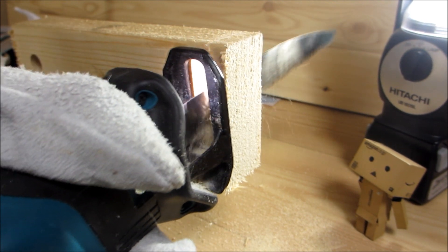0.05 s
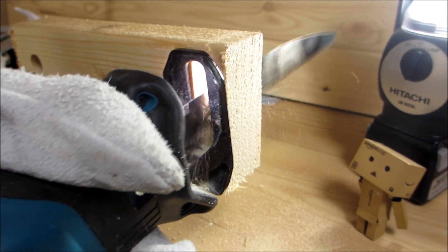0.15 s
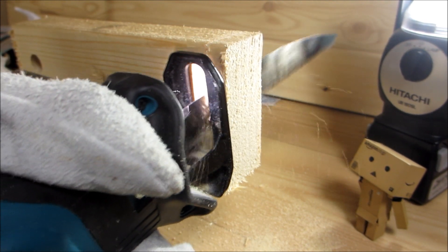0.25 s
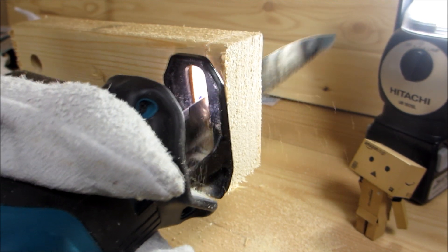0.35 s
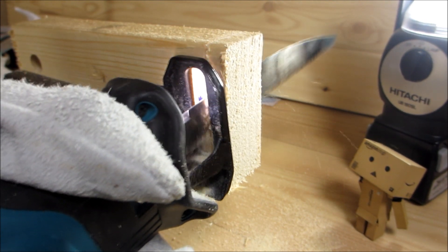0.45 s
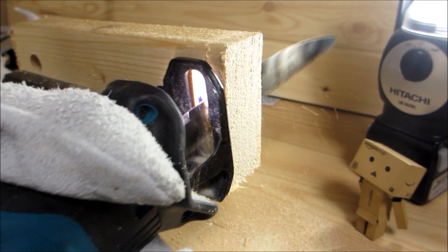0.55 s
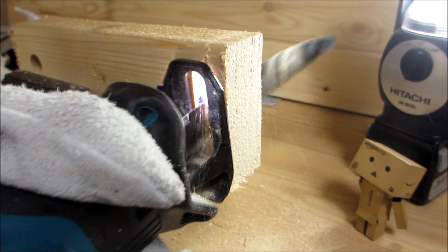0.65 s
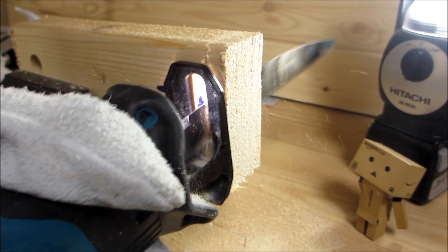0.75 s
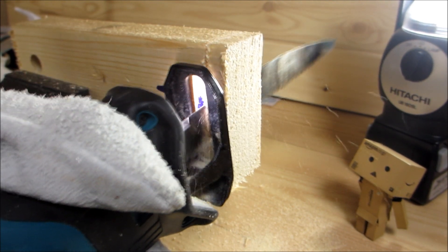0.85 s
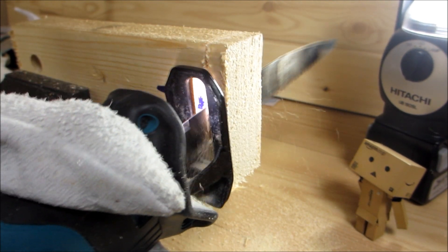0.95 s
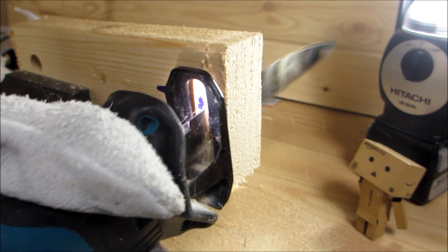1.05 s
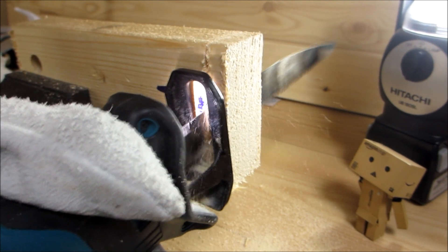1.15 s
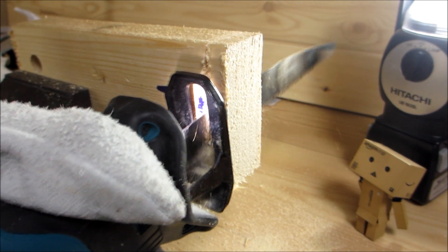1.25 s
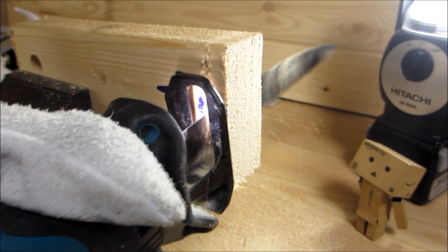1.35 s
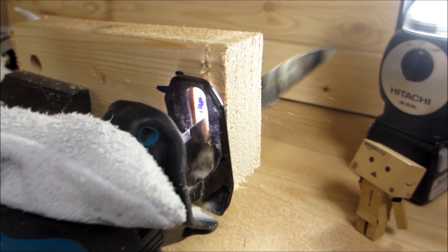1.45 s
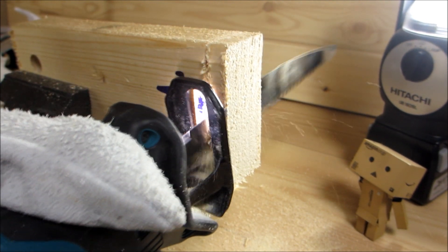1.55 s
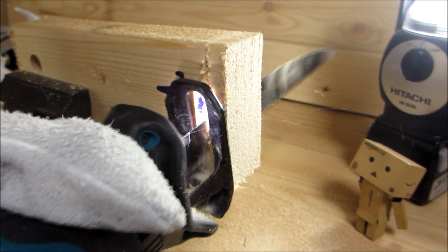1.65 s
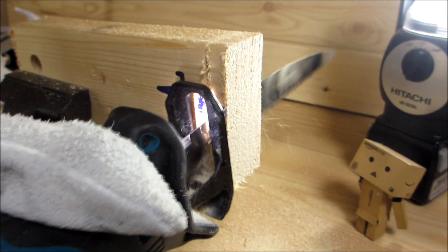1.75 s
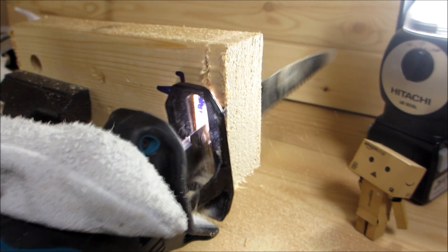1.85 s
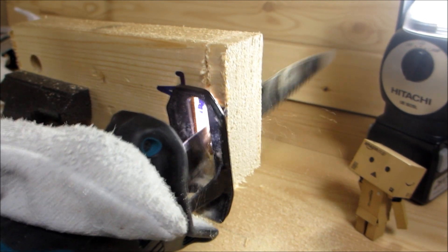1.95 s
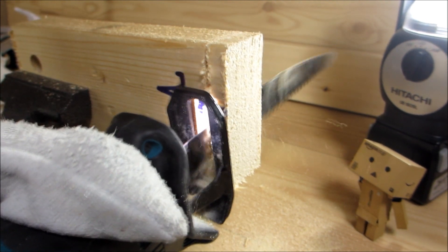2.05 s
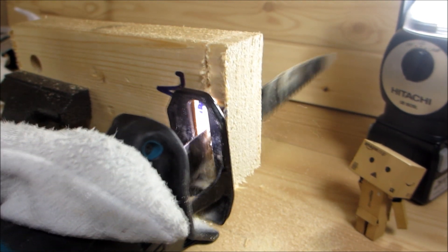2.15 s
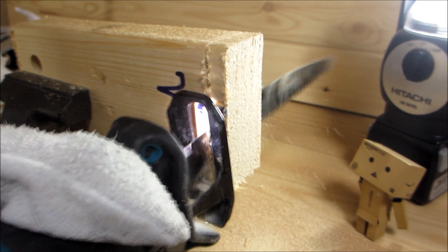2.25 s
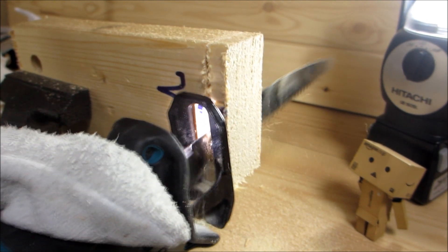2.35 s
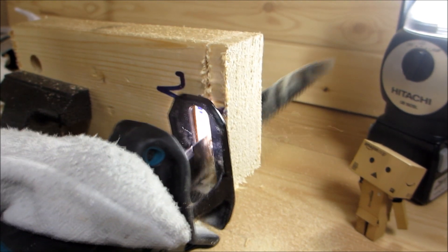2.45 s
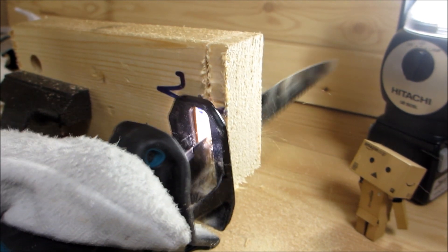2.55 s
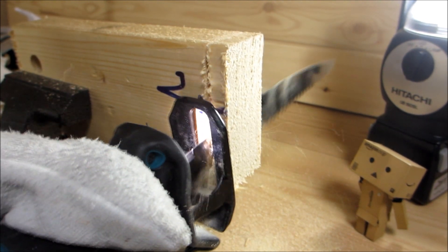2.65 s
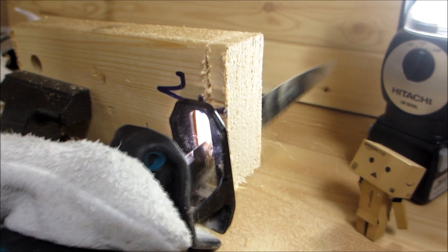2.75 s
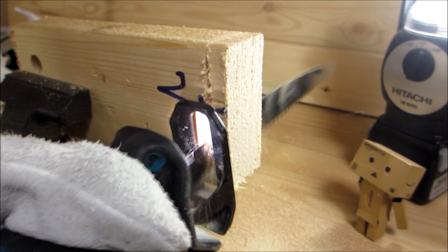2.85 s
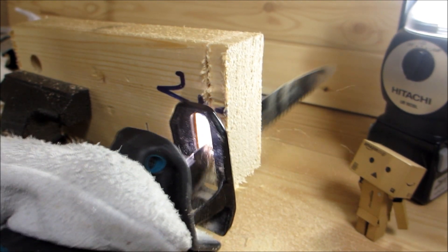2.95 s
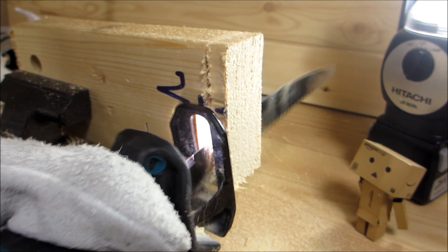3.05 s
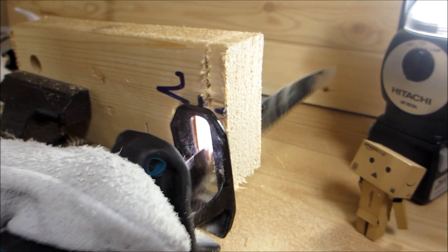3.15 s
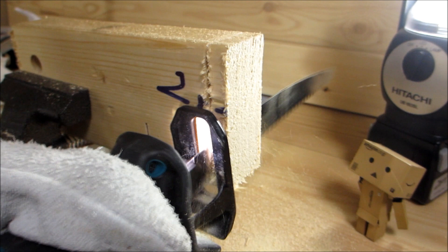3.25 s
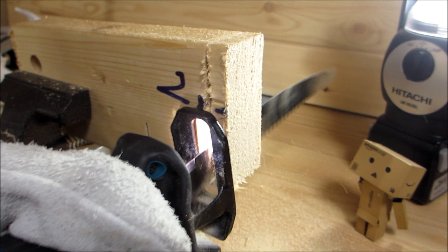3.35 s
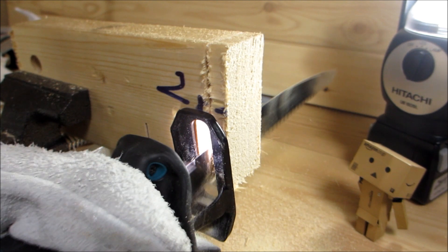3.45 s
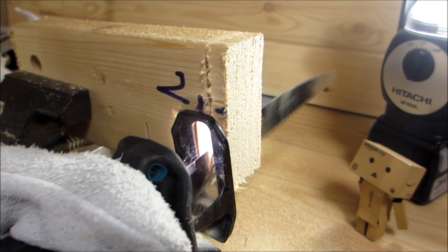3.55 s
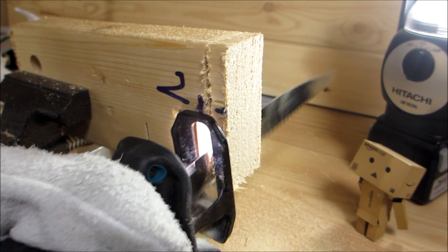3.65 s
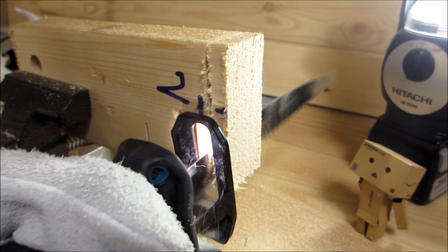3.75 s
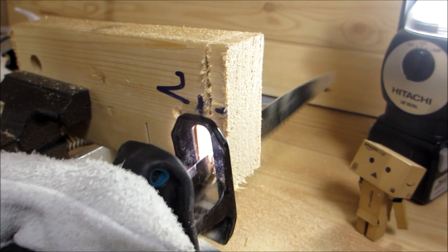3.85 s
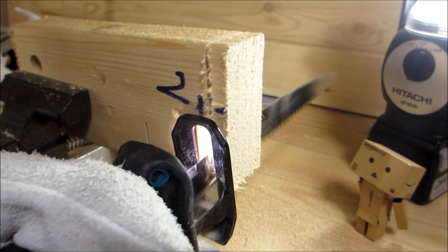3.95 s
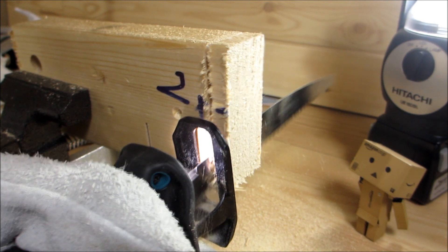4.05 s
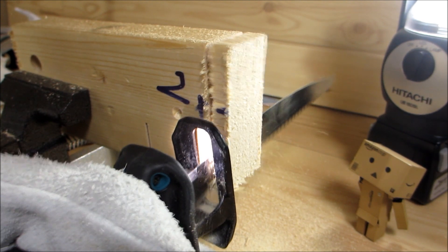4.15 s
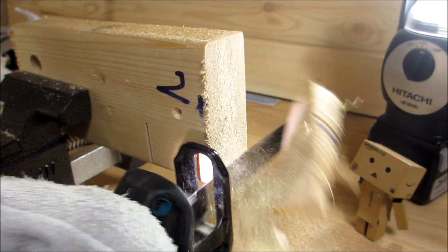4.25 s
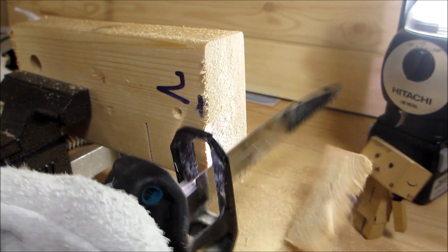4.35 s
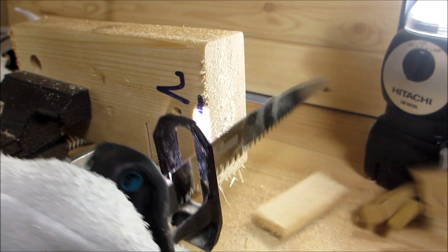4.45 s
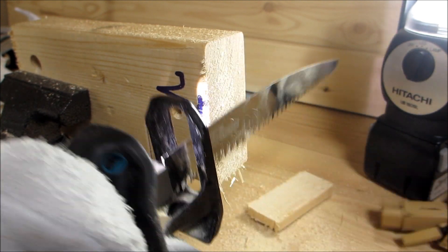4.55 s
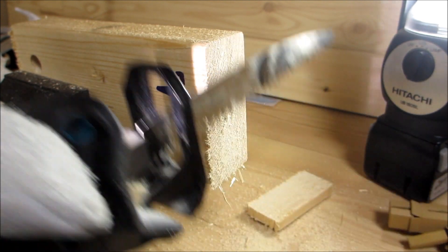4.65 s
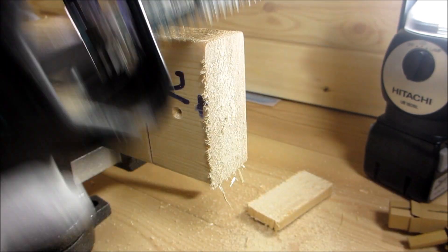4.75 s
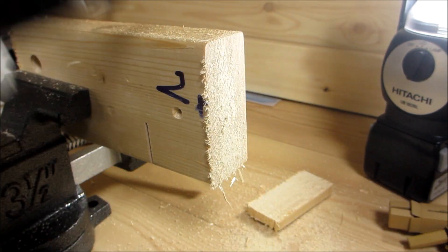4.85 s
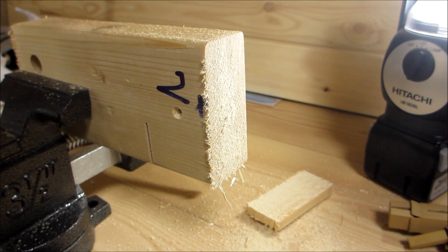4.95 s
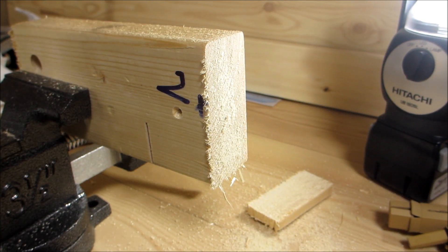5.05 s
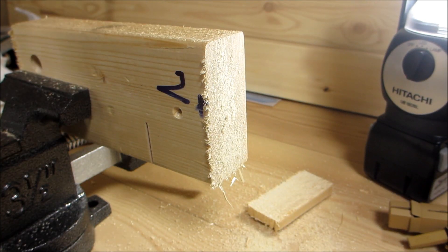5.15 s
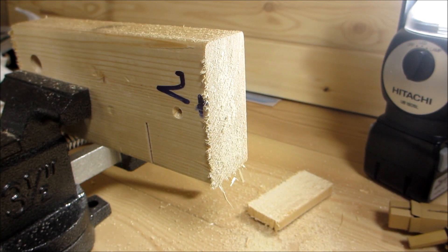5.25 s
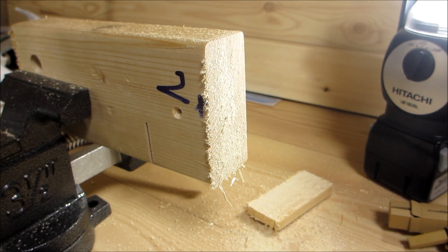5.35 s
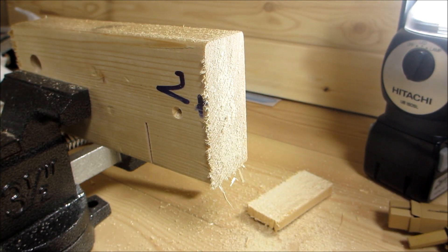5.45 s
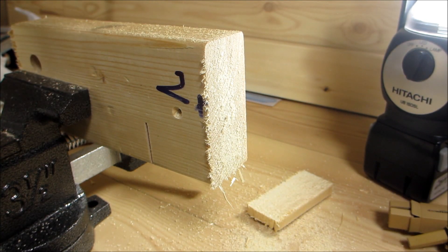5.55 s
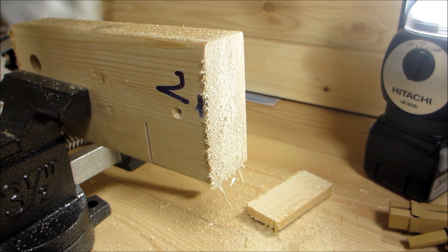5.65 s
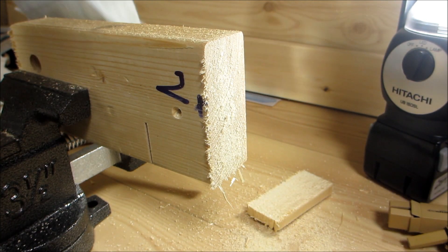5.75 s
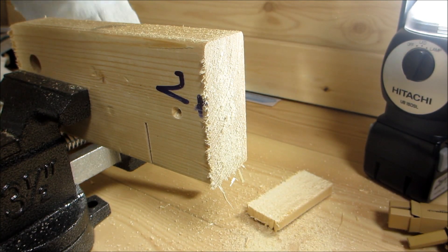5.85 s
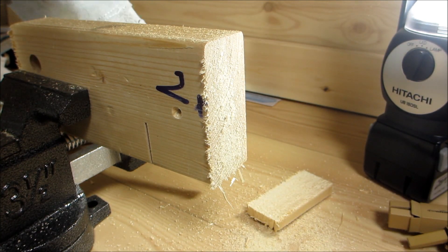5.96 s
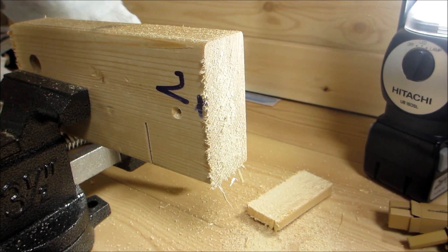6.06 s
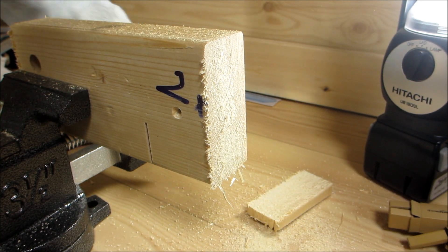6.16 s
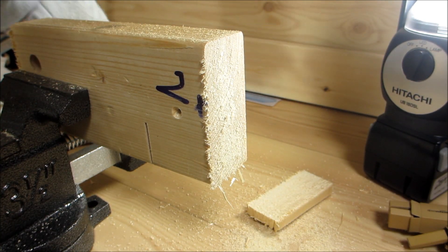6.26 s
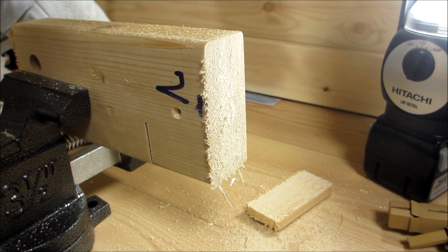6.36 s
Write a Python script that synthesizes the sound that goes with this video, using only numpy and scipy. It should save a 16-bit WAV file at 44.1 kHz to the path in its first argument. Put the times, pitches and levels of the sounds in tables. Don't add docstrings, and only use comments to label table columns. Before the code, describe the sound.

A cordless reciprocating saw chatters loudly through a clamped softwood beam, snags and breaks free, the offcut tumbles, then faint rustles and metallic vice-handle knocks.

```python
import sys
import numpy as np
from scipy import signal
from scipy.fft import rfft, irfft, next_fast_len
from scipy.io import wavfile
from scipy.ndimage import uniform_filter1d

SR = 44100
rng = np.random.default_rng(int(sys.argv[2]) if len(sys.argv) > 2 else 0)


def gain_from_db(level_db):
    decades = np.asarray(level_db, float) / 20
    return 10 ** decades


def materialize(psi):
    bounded = np.clip(np.atleast_2d(psi).T, -1, 1)
    quanta = np.round(bounded * 32767).astype(np.int16)
    wavfile.write(sys.argv[1], SR, quanta)


N = 283122
T = np.arange(N) / SR
BENCH_HZ = 210.4
THIN_S, NEAR_GONE_S, THROUGH_S = 3.136, 3.49, 4.26
BRAKE_S, SETTLE_S, STOP_S = 4.545, 4.665, 4.76
CUTTING, RUNNING = T < THROUGH_S, T < BRAKE_S
FREE_S = np.maximum(T - THROUGH_S, 0)
THIN = np.clip((T - THIN_S) / 0.24, 0, 1)
FREE_FADE = gain_from_db(-150 * FREE_S)

# time in seconds, level in dB.
PRESSURE = [(0, -26), (.6, -25), (1.3, -25), (1.6, -25), (2.3, -25), (2.95, -25), (3.3, -24), (3.8, -27),
            (4.05, -24.5), (4.105, -31.5), (4.15, -25.5), (4.27, -28.5), (4.34, -30), (4.41, -30.5),
            (4.54, -31.5), (4.575, -43.5), (4.66, -49.5), (4.74, -64)]


def saw():
    turns = crank()
    chatter = gain_from_db(-.5 * wander(240) * THIN * CUTTING)
    pressure = level(PRESSURE) * chatter
    load = pressure / gain_from_db(PRESSURE[0][1])
    bites = teeth(turns)
    out = tearing(bites, pressure) + stroke_ends(turns) + rebounds(turns, load)
    out += housing(turns) + bench(turns, bites) + motor(turns, load)
    return out + loose_housing() + brake(bites)


# stage start in seconds, strokes per second.
STROKE_RATE = [(0, 37.21), (.7, 36.8), (2., 35.6), (3.1, 37.15), (3.3, 38.4), (3.5, 39.5), (3.6, 39.97),
               (4.2, 43.), (4.3, 41.), (4.45, 37), (4.5, 33), (4.55, 21.), (4.75, 0)]
# time in seconds, lag in turns.
CRANK_LAG = [(0, .085), (.3, .062), (.88, .088), (1.07, .075), (1.24, .005), (1.42, .03), (1.8, .022),
             (2.0, -.005), (2.4, -.017), (2.6, .028), (2.78, .005), (2.98, .035), (3.18, 0), (3.37, .015),
             (3.55, -.01), (4.1, -.005), (4.25, .02)]


def crank():
    stage_s, rate = np.transpose(STROKE_RATE)
    stepped = rate[np.searchsorted(stage_s, T, "right") - 1]
    smooth = uniform_filter1d(stepped, size=4000, mode="nearest")
    return -.98 + np.cumsum(smooth) / SR - np.interp(T, *np.transpose(CRANK_LAG))


def teeth(turns):
    swing = np.where(CUTTING, .35, .5)
    pull = np.exp(swing * np.cos(4 * np.pi * (turns - .15)) + 0.12 * np.cos(2 * np.pi * (turns - .75)))
    strength = gain_from_db(.7 * np.minimum(rng.exponential(1, N), 3))
    fresh = (rng.random(N) < 12000 / SR) * rng.standard_normal(N) * strength
    edge = rng.standard_normal((40, 1200)) * (rng.random((40, 1200)) < .3)
    depth = 7 * T
    place = (turns % 1 * 1200).astype(int)
    row = depth.astype(int) % 39
    blend = np.pi / 2 * (depth % 1)
    returning = np.cos(blend) * edge[row, place] + np.sin(blend) * edge[row + 1, place]
    return pull * (evened(fresh) + 0.68 * evened(returning))


# frequency in Hz, level in dB.
BEAM = [(71, -38.5), (120, -5.5), (216, 3), (452, -6.5), (680, 2), (1250, -10), (1470, -11), (1760, -14.5),
        (2920, -32), (4120, -30), (6000, -38), (7800, -52), (13200, -120)]
# frequency in Hz, width in Hz, lift in dB.
BEAM_PEAKS = [(359, 110, 3.5), (520, 97, 3), (711, 177, 6), (905, 130, 2.5), (1118, 384, 11), (1288, 30, 7),
              (1784, 355, 10.5), (2890, 150, 4.5), (3570, 110, 2.5)]
# time in seconds, gain in dB.
BRIDGE = [(0, -0.5), (1.5, -4), (3, -5.5), (3.7, -11.5), (4.1, -5), (4.3, -1.5), (4.8, -23)]
# time in seconds, gain in dB.
BELLY = [(0, 2), (1.5, -0.5), (2.5, 0), (3.3, -0.5), (3.6, 5), (4.2, 5), (4.3, -0.5), (4.8, 4.5)]


def tearing(bites, pressure):
    beam = evened(colour(bites, BEAM, BEAM_PEAKS))
    upper = zero_phase(beam, [930, 1500], "band")
    belly = zero_phase(beam, [520, 780], "band")
    lower = zero_phase(beam, 500, "low") * np.clip(FREE_S / .07, 0, .9)
    shaped = beam + (level(BRIDGE) - 1) * upper + (level(BELLY) - 1) * belly - lower
    return gain_from_db(-2.5) * pressure * shaped


# frequency in Hz, level in dB.
FAR_END = [(200, -21), (500, -10.5), (900, -4), (1250, 0), (1800, 0), (3000, -1), (4200, -7), (5600, -0.5),
           (7000, -1.5), (8500, -9), (11000, -0.5), (15500, -17)]
# frequency in Hz, level in dB.
NEAR_END = [(200, -21), (500, -12.5), (850, -14), (1150, -3.5), (2000, -15), (3200, -13.5), (5000, -24.5),
            (15000, -49)]


def stroke_ends(turns):
    far_late_db = (1.5 - 3.5 * (T - THIN_S - .3)) * THIN
    far_db = 13.5 + np.where(CUTTING, -46 + far_late_db, -59)
    jam = 1 - 0.45 * (abs(T - 4.1) < .012)
    far = gain_from_db(far_db) * jam * stroke_end(turns, -0.03954, 0.0011, 0.89, 1.0, FAR_END)
    near_db = 3.0 + np.where(CUTTING, -36 - 0.22 * T - 17 * (T > NEAR_GONE_S), -61.5)
    near = gain_from_db(near_db) * stroke_end(turns, .46, 0.013, 0.46, 1.0, NEAR_END)
    return RUNNING * (far - near)


# frequency in Hz, level in dB.
REBOUND = [(200, -17), (420, -12.5), (700, -2), (1100, -13), (1800, -12.5), (2800, -19), (5000, -36.5),
           (15000, -43.5)]


def rebounds(turns, load):
    push = gain_from_db(-39 + 1.5 * T) * stroke_end(turns, .07, 0.0075, 0.93, 1.6, REBOUND)
    pull = gain_from_db(-41) * stroke_end(turns, .58, 0.0075, 0.93, 1.6, REBOUND)
    contact = np.where(CUTTING, gain_from_db(-5 * (T > NEAR_GONE_S)), gain_from_db(-23))
    return load * RUNNING * contact * (push + pull)


def stroke_end(turns, at_turn, burst_s, spread_db, rough, points):
    late, loose = rng.standard_normal((2, 400))
    stroke = np.floor(turns - at_turn).astype(int) + 1
    delay = .04 + .005 * np.clip(late, -2, 2)[stroke]
    since = np.maximum((turns - at_turn) % 1 - delay, 0) / 37
    blow = np.diff(since > 0, prepend=True) & (since > 0) & (since < .001)
    blunt = signal.sosfilt(signal.butter(2, 2500, fs=SR, output="sos"), 1. * np.roll(blow, 22))
    rattle = np.exp(-since / burst_s) * (1 - np.exp(-since / .001)) * rng.standard_normal(N)
    impacts = evened(blunt) + rough * evened(rattle)
    strength = gain_from_db(spread_db * np.clip(loose, -2, 1.5))[stroke]
    return evened(colour(strength * impacts, points, BEAM_PEAKS))


# multiple of stroke rate, level in dB, phase in rad.
SHAKE = [(1, -46, 16), (2, -17, -1), (3, 1, 0.63), (4, -2, -1), (5, -15, -2.5), (7, -5, -0.15),
         (8, -9.5, 5), (9, -3.5, -1.5), (15, -27, 2)]


def housing(turns):
    out = np.zeros(N)
    for k, db, rad in SHAKE:
        gain = gain_from_db(db + 0.97 * wander(7.6) - 6.7 * THIN * (k > 6))
        out += gain * np.cos(2 * np.pi * k * turns + rad + 0.08 * k * wander(16))
    fade = gain_from_db(3.5 - 38 - 2.2 * T - 15 * np.maximum(T - 3.6, 0)) * FREE_FADE
    return fade * RUNNING * evened(out)


# time in seconds, lift in dB.
SURGES = [(.0, 14.5), (.34, 2), (.48, 4), (.57, 5), (.92, 5.5), (1.32, 7.5), (1.75, 2), (1.95, 2.5),
          (2.12, 2.5), (2.35, 5.5), (2.45, -2), (2.66, -7.5), (2.86, 4), (3.03, -14), (3.24, 2),
          (3.51, 7.5), (3.62, 5), (3.74, 4.5), (3.92, 1), (4.08, 5), (4.18, -3), (4.28, -0.5)]


def bench(turns, bites):
    push = sum(np.cos(2 * np.pi * k * turns - 2.2 + 0.68 * wander(24.0)) for k in (5, 6))
    driven = evened(resonate(resonate(push, BENCH_HZ, 24), BENCH_HZ, 40))
    bitten = evened(resonate(resonate(bites, BENCH_HZ, 9), BENCH_HZ, 30))
    hum = gain_from_db(-0.8 - 38.5 + bumps(SURGES, 0.052) - 200 * FREE_S)
    return hum * evened(driven + .5 * bitten)


# frequency in Hz, level in dB.
HISS = [(880, -20.5), (1500, 3.5), (1770, -4.5), (1930, 1.5), (2110, 0), (2950, -0.5), (3400, -7),
        (3680, -8.5), (4000, -12), (4240, -14), (6710, -11.5), (8830, -14), (10700, -7), (14500, -16),
        (15600, -14)]


def motor(turns, load):
    throb = 1 + 0.036 * np.cos(2 * np.pi * (turns - .12)) + 0.013 * np.cos(4 * np.pi * (turns - .2))
    hiss = colour(rng.standard_normal(N) * gain_from_db(1.54 * wander(400)), HISS) * throb
    whine = gain_from_db(-21) * evened(resonate(rng.standard_normal(N), 6950, 30))
    running_db = [(THROUGH_S, -40), (BRAKE_S, -40 - 7.5), (BRAKE_S + 0.021, -65), (SETTLE_S, -65),
                  (STOP_S, -97)]
    return gain_from_db(4.5) * level(running_db) * np.where(CUTTING, load, 1) * (hiss + whine)


def loose_housing():
    rumble = evened(resonate(resonate(rng.standard_normal(N), 110, 55), 110, 55))
    return gain_from_db(-48) * THIN * FREE_FADE * rumble


def brake(bites):
    rub = evened(resonate(resonate(bites, 2000, 2200), 2000, 2200))
    return gain_from_db(-54.5) * bumps([(4.57, 1)], 0.1) * (T > BRAKE_S) * rub


# time in seconds, peak in dB, body frequency in Hz, tick in dB.
SNAGS = [
    (3.444, -12, 1300, -18),
    (3.497, -22, 1500, -18),
    (3.509, -17, 1300, -24),
    (3.773, -14, 1000, -18),
    (3.873, -26, 900, -8),
    (4.122, -13, 1100, -18),
    (4.246, -17, 900, -25),
    (4.266, -27, 800, -6),
    (4.303, -32, 2600, -40),
    (4.489, -31, 2300, -40),
]
# time in seconds, peak in dB, body in Hz, tick in dB.
SLAPS = [(4.344, -29.5, 930, -20), (4.365, -29, 945, -21), (4.38, -30, 940, -23), (4.391, -26.5, 950, -19),
         (4.401, -27, 950, -22), (4.412, -22, 955, -23), (4.424, -26, 950, -25), (4.436, -32, 950, -24),
         (4.446, -28.5, 950, -18), (4.46, -27, 950, -20), (4.472, -27.5, 950, -17), (4.487, -33, 950, -22),
         (4.502, -29, 950, -18), (4.516, -34, 940, -20)]
# time in seconds, peak in dB, body in Hz, tick in dB.
TUMBLE = [(4.533, -26.5, 700, -19), (4.541, -41.5, 716, -21.5), (4.563, -32, 750, -27),
          (4.589, -36, 640, -15), (4.605, -32.5, 674, -21), (4.621, -52, 955, -12),
          (4.632, -34.5, 810, -11), (4.647, -26.5, 910, -16.5), (4.652, -33, 776, -22),
          (4.659, -32, 664, -19), (4.674, -39, 700, -19), (4.716, -46, 646, -12), (4.728, -56, 834, -7)]
# time in seconds, peak in dB, body in Hz, tick in dB.
CHIPS = [(4.845, -58, 700, -20), (4.903, -55, 900, -20), (4.919, -42.5, 1750, -25), (4.94, -52, 1200, -26),
         (4.951, -57, 1200, -26), (5.19, -45, 925, -33), (5.194, -38.5, 1010, -46), (5.204, -49, 714, -40),
         (5.263, -51, 2370, -13), (5.266, -43.5, 1640, -23), (5.325, -40, 1470, -21),
         (5.328, -42, 1215, -29.5), (5.343, -52, 1400, -24), (5.35, -47, 1500, -17),
         (5.363, -40, 1200, -26), (5.369, -37.5, 1620, -23), (5.378, -66, 904, -30),
         (5.389, -48, 1000, -30)]
# time in seconds, peak in dB, body in Hz, tick in dB.
CLANKS = [
    (6.139, -37, 715, -0.5),
    (6.154, -30, 738, -30),
    (6.167, -34.5, 665, -30),
    (6.2, -50, 1400, -32),
    (6.284, -40, 824, -29),
    (6.33, -43, 620, -21),
    (6.346, -31.5, 940, -11.5),
    (6.35, -31.5, 950, -29),
]


def knocks(out):
    groups = ((SNAGS, -40, 0.021, .8), (TUMBLE, -19, 0.029, 1.6), (CHIPS, -33, 0.025, 1),
              (CLANKS, -5.5, .06, 2.9), (SLAPS, -50, .03, 1.5))
    for rows, thud_db, t60_s, rough in groups:
        for s, db, hz, tick_db in rows:
            add(out, s - .001, gain_from_db(db) * knock(hz, thud_db, tick_db, t60_s, rough))


# factor on body frequency, relative width, level in dB.
BODY = [(.62, .3, -3), (1., .3, 0), (1.5, .4, -5), (2.1, .6, -16)]


def knock(hz, thud_db, tick_db, t60_s, rough):
    t = np.arange(SR // 4) / SR
    scrape = bright_noise(len(t)) * gain_from_db(-60 * t / max(t60_s, .008)) * (1 - np.exp(-t / .0006))
    click = np.diff(np.arange(len(t) + 1) == 12) * rng.choice([-.7, .7])
    blow = rough * scrape / np.linalg.norm(scrape) + click
    body = np.zeros(len(t))
    for k, w, db in BODY:
        body += gain_from_db(db) * evened(resonate(resonate(blow, hz * k, hz * w), hz * k, 2 * hz * w))
    band = signal.butter(2, [.45 * hz, 2.6 * hz], "band", fs=SR, output="sos")
    body = signal.sosfilt(band, body - .5 * np.roll(body, 8))
    tick = evened(resonate(resonate(bright_noise(len(t)), 2500, 6000), 8000, 12000))
    tick *= np.exp(-t / 0.0014) + 0.06 * np.exp(-t / 0.023)
    thud = np.sin(2 * np.pi * BENCH_HZ * t) * (1 - np.exp(-t / 0.0076)) * gain_from_db(-60 * t / 0.098)
    return body / abs(body).max() + gain_from_db(tick_db + 1.0) * tick + gain_from_db(thud_db + 10.0) * thud


# time in seconds, level in dB.
SLIDE = [(6.14, -27.5), (6.158, -27), (6.174, -30), (6.29, -34), (6.338, -36), (6.348, -26.5), (6.42, -41)]
# frequency in Hz, level in dB.
VICE = [(180, -47), (300, -14), (814, -3.5), (1080, -20), (1370, -13.5), (2040, -29.5), (3020, -25),
        (4250, -46), (15000, -51)]
# frequency in Hz, width in Hz, lift in dB.
HANDLE_PEAKS = [(603, 60, 6), (810, 59, 0.5), (1400, 49, 9), (2920, 200, 0), (3700, 150, -1.5),
                (5700, 150, 4), (7000, 100, 8), (10400, 150, 10), (13540, 120, 9)]
# time in seconds, level passed to the bench legs in dB.
STEEL_AT = [
    (6.138, -56),
    (6.191, -80),
    (6.282, -75),
    (6.346, -45),
]
# frequency in Hz, level in dB, t60 in seconds.
STEEL = [
    [(592, -52, .1), (738, -29, 0.12), (1394, -49, .14), (2746, -49, 0.09), (2030, -49, .066),
     (3321, -50.5, 0.12), (4430, -56, 0.065), (5930, -54, .08), (6970, -51, .1), (8550, -52, .06),
     (10260, -52, 0.087), (13600, -65, .12)],
    [(1430, -40, .09), (1530, -46, .06)],
    [(1330, -46.5, 0.15), (2960, -63, .1), (5700, -68, .1), (6900, -68, .12), (8230, -70, .04),
     (13500, -77, .1)],
    [(544, -43, 0.14), (953, -31.5, 0.1), (1375, -52, .1), (1815, -42, 0.034), (2600, -48, 0.1),
     (2910, -35.5, 0.065), (3930, -48.5, 0.12), (6100, -62, .09), (8130, -50, 0.056), (10450, -54, .07),
     (13800, -64, .07)],
]


def handle():
    slips = rng.standard_normal(N) * (rng.random(N) < 9000 / SR) * gain_from_db(0.97 * wander(60))
    sliding = T > SLIDE[0][0]
    out = gain_from_db(-12.5) * level(SLIDE) * sliding * evened(colour(slips, VICE, HANDLE_PEAKS))
    t = np.arange(SR // 4) / SR
    for (at_s, legs_db), modes in zip(STEEL_AT, STEEL):
        for hz, db, t60_s in modes:
            ring = np.sin(2 * np.pi * (hz * t + rng.random()))
            rattle = 0.73 * evened(resonate(bright_noise(len(t)), hz, 45))
            add(out, at_s, gain_from_db(db - 60 * t / min(t60_s, .14)) * (ring + rattle))
        legs = gain_from_db(legs_db - 60 * t / 0.124) * (1 - np.exp(-t / 0.011)) * np.sin(2 * np.pi * 95 * t)
        add(out, at_s, legs)
    return out


# time in seconds, half length in seconds, level in dB.
RUSTLE = [
    (4.68, 0.035, -85),
    (4.881, 0.16, -82),
    (5.194, 0.062, -80.5),
    (5.317, 0.073, -76),
    (5.46, .05, -78),
]


def rustle():
    hiss = resonate(resonate(rng.standard_normal(N), 11500, 3500), 11500, 3500)
    moves = sum(bumps([(s, gain_from_db(db))], half_s) for s, half_s, db in RUSTLE)
    return moves * evened(hiss * gain_from_db(2.2 * wander(80)))


# frequency in Hz, t60 in seconds.
ROOM = [(200, .25), (1000, .2), (4000, .15), (12000, .1)]


def room(near):
    count = int(.5 * SR) // 20
    taps = np.zeros(count * 20)
    taps[np.arange(0, len(taps), 20) + rng.integers(0, 20, count)] = rng.choice([-1., 1.], count)
    hz, t, z = signal.stft(taps, SR, nperseg=128)
    tail = signal.istft(z * gain_from_db(-60 * t / read(ROOM, hz)[:, None]), SR, nperseg=128)[1]
    tail /= np.linalg.norm(tail)
    return gain_from_db(-13.5) * signal.oaconvolve(near, np.r_[np.zeros(150), tail])[:N]


# frequency in Hz, level in dB.
LEFT_DB = [(60, -4.0), (130, -4.0), (290, -4.5), (640, -5.0), (1410, -6.5), (3100, -8.0), (6820, -11.5),
           (15000, -13.5)]
# frequency in Hz, lead in rad.
LEFT_LEAD = [(60, 3.14), (400, 3.0), (1030, 2.35), (3190, 1.7), (7750, 1.4), (15000, 1.5)]
# frequency in Hz, share common to both.
ALIKE = [(300, .9995), (1000, .98), (2400, .88), (5000, .74), (15000, .68)]


def ports(x):
    size = next_fast_len(N + SR)
    hz = np.fft.rfftfreq(size, 1 / SR)
    alike = np.clip(read(ALIKE, hz), 0, 1)
    left = gain_from_db(read(LEFT_DB, hz) - 1.7 * np.tanh(hz / 5000))
    common = alike * left * np.exp(1j * read(LEFT_LEAD, hz))
    apart = np.sqrt(1 - alike ** 2) * left
    scale = 2 / np.sqrt(abs(1 + common) ** 2 + apart ** 2)
    direct = scale * rfft(x, size)
    aside = irfft(apart * direct, size)[:N]
    z = signal.stft(aside, nperseg=128)[2]
    scattered = signal.istft(z * np.exp(2j * np.pi * rng.random(z.shape)), nperseg=128)[1][:N]
    scattered = rfft(scattered * np.std(aside) / np.std(scattered), size)
    return irfft([common * direct + scattered, direct], size)[:, :N]


# frequency in Hz, level in dB.
FLOOR_MID = [(15, -42), (25, -17), (49, -18.5), (86, -8.5), (165, -9), (199, -2.5), (227, -9), (524, -11),
             (724, -12.5), (1270, -10.5), (1420, -13), (4400, -34), (15600, -36)]
# frequency in Hz, level in dB.
FLOOR_SIDE = [(15, -37), (25, -4), (80, -18), (119, -3.5), (165, -8), (199, -7.5), (331, -7.5),
              (369, -22.5), (470, -7.5), (616, -14.5), (1310, -19), (4160, -46.5), (15600, -54)]


def floor():
    mid = gain_from_db(-67 + 0.4 * wander(6)) * colour(rng.standard_normal(N), FLOOR_MID)
    side = gain_from_db(-56 + 1.1 * wander(3.3)) * colour(rng.standard_normal(N), FLOOR_SIDE)
    return np.array([mid + side, mid - side])


def evened(x):
    return x / np.sqrt(np.mean(x ** 2) + 1e-20)


def read(points, hz):
    f, value = np.transpose(points)
    return np.interp(np.log(hz + 1), np.log(f + 1), value)


def level(rows):
    s, db = np.transpose(rows)
    return gain_from_db(np.interp(T, s, db, right=-120))


def bumps(rows, width_s):
    return sum(height * np.exp(-((T - s) / width_s) ** 2) for s, height in rows)


def wander(per_s):
    size = max(int(SR / per_s), 2)
    return evened(uniform_filter1d(uniform_filter1d(rng.standard_normal(N), size), size))


def bright_noise(count):
    return np.diff(rng.standard_normal(count + 1))


def add(mix, s, sound):
    part = mix[round(s * SR):][:len(sound)]
    part += sound[:len(part)]


def colour(x, points, peaks=()):
    hz = abs(np.fft.fftfreq(8192, 1 / SR))
    db = read(points, hz)
    for f, w, lift_db in peaks:
        db = db + lift_db / (1 + ((hz - f) / (w / 2)) ** 2)
    log_gain = np.log(gain_from_db(np.maximum(db, -100)))
    taps = np.fft.ifft(np.exp(np.conj(signal.hilbert(log_gain)))).real[:4096]
    return signal.oaconvolve(x, taps / np.linalg.norm(taps))[:len(x)]


def resonate(x, hz, width_hz):
    r = np.exp(-np.pi * width_hz / SR)
    return signal.lfilter([1 - r], [1, -2 * r * np.cos(2 * np.pi * hz / SR), r * r], x)


def zero_phase(x, hz, kind):
    return signal.sosfiltfilt(signal.butter(2, hz, kind, fs=SR, output="sos"), x)


def scene():
    near = saw() + handle() + rustle()
    knocks(near)
    return ports(near + room(near)) + floor()


def low_pass(x):
    return signal.sosfilt(signal.butter(12, 15730, fs=SR, output="sos"), x)


def record(dry):
    overloaded = 0.82 * np.tanh(dry / 1.058)
    edge = signal.firwin(301, 15600, fs=SR)[None]
    return low_pass(signal.oaconvolve(overloaded, edge, "same"))


dry = scene()
out = record(dry)
materialize(out)
```